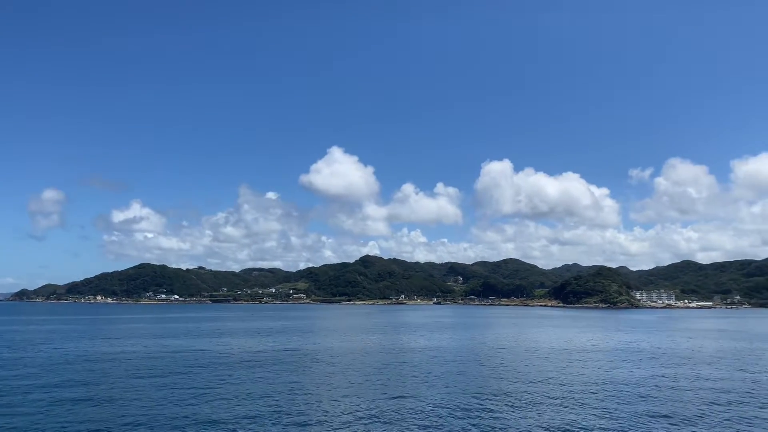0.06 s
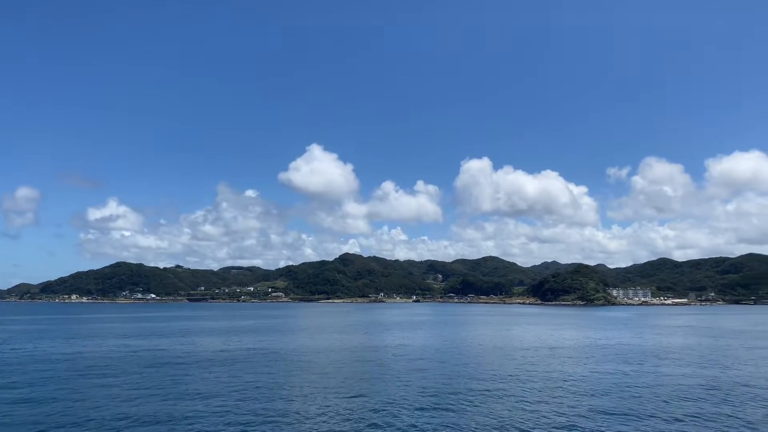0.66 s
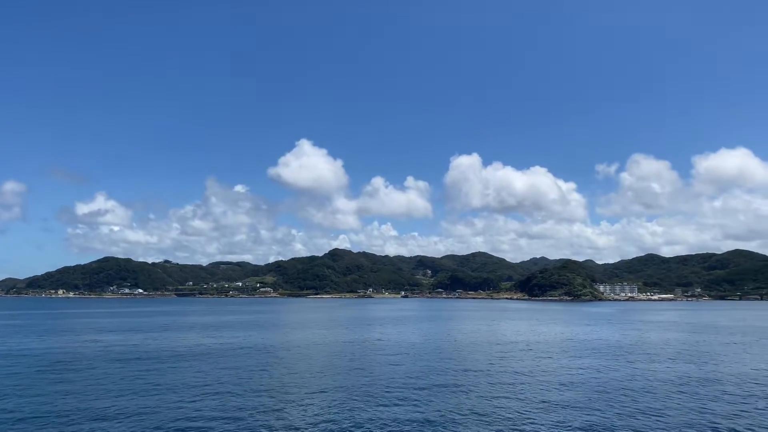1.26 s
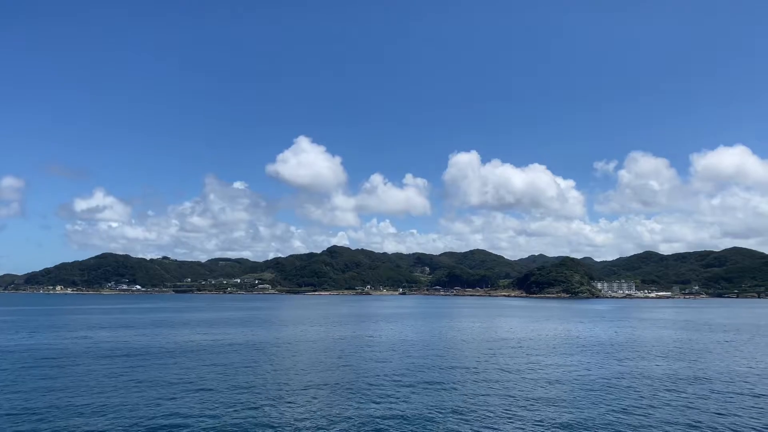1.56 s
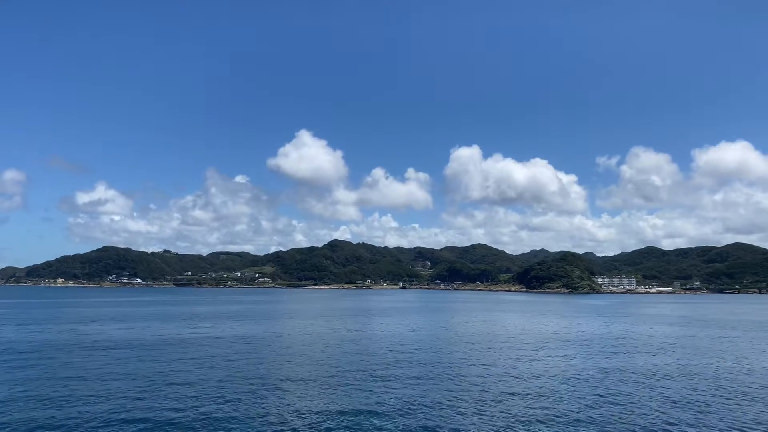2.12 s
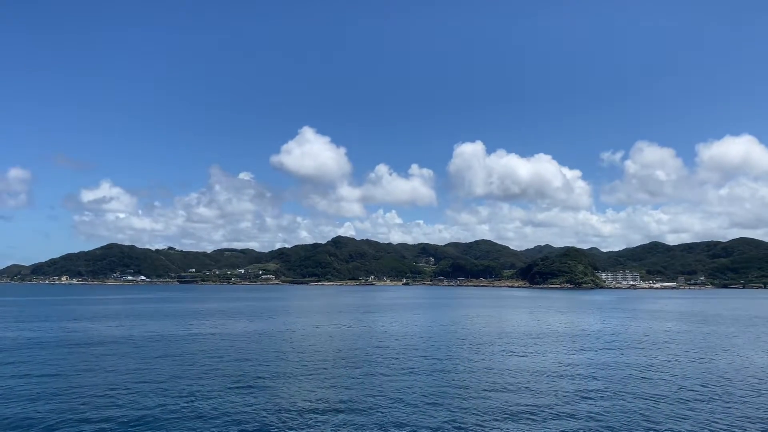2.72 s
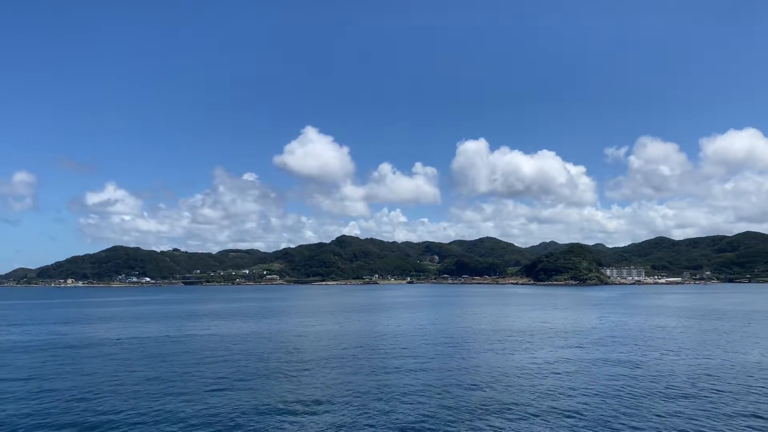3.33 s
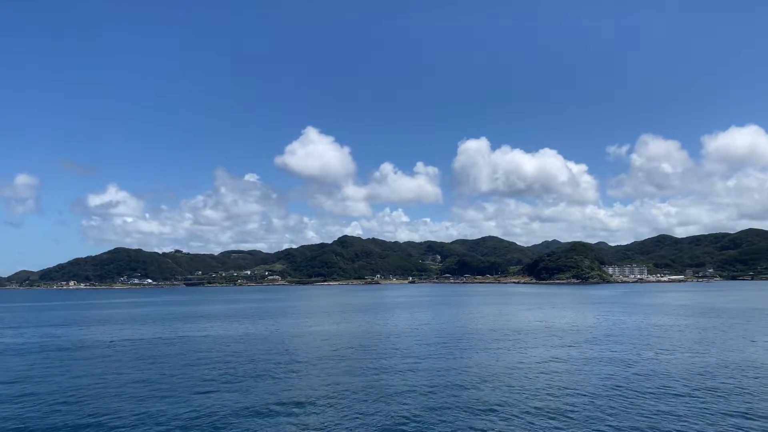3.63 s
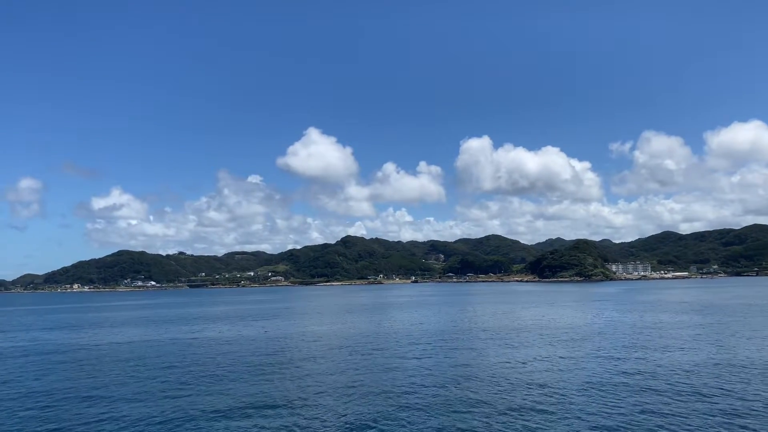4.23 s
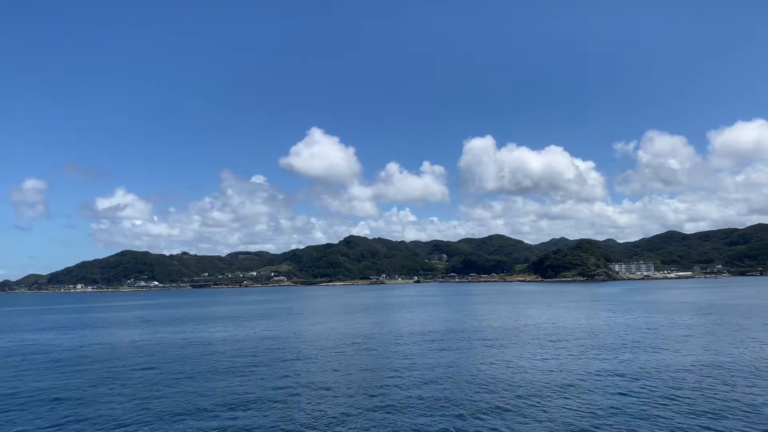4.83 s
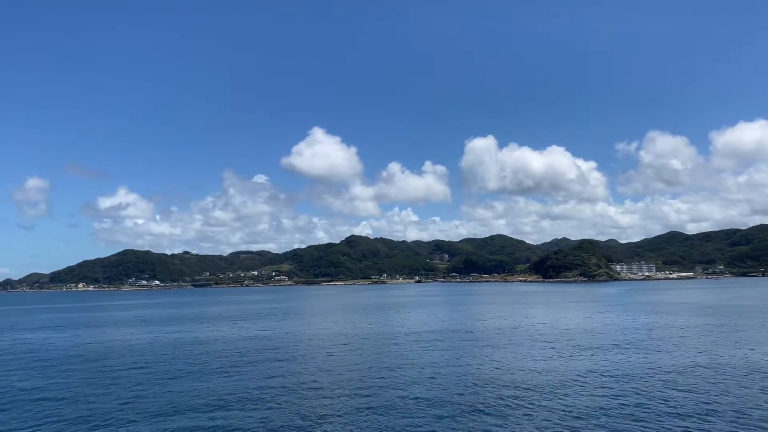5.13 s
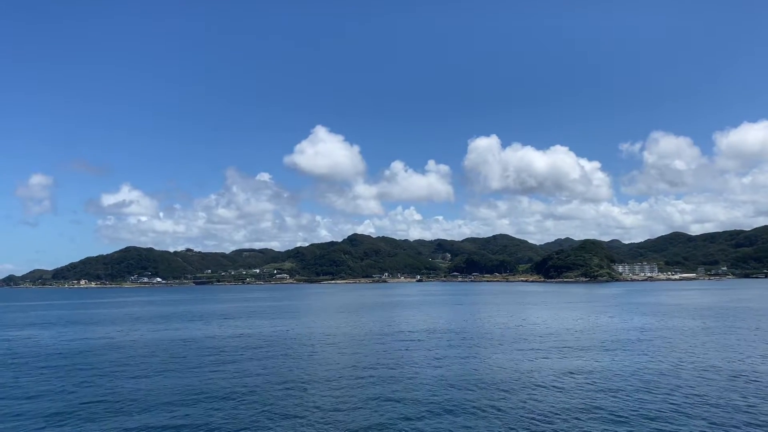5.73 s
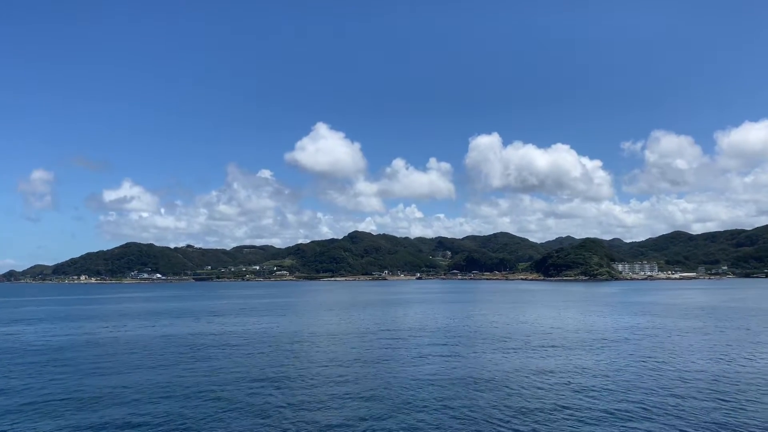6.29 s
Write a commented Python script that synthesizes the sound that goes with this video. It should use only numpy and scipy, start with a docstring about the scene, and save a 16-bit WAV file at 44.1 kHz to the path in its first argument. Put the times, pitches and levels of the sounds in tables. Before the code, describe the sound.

On the open deck of a ferry on a calm sea, diesel engines drone over a throbbing hull and a low roar. Foamy water hisses along the side, easing briefly near the start, and a faint machine whine comes through. About two seconds in, gusts buffet the microphone with a lumpy rumble for a second and a half. A weaker gust comes near the end as the drone continues.

```python
"""On the open deck of a ferry under way on a calm sea. From the start, periodic diesel firings drone over
the throb of the hull and a turbulent roar, while bubbles in the bow wash hiss along the side.
The wash slackens around 1 s, then a machine's whine comes clear. From about 2 s, gusts buffet the
microphone for a second and a half, and wind reduction turns the bass down under them.
A weaker gust follows at 5.6 s, near the end."""
import sys
import numpy as np
from scipy import signal
from scipy.fft import rfft, irfft, next_fast_len
from scipy.io import wavfile
from scipy.ndimage import uniform_filter1d, minimum_filter1d

SR = 44100
rng = np.random.default_rng(int(sys.argv[2]) if len(sys.argv) > 2 else 0)


def wav_out(sig):
    """Save sig, one row per channel (or a flat mono array), as 16-bit PCM at SR to the path in sys.argv[1]."""
    wavfile.write(sys.argv[1], SR, np.round(np.clip(np.atleast_2d(sig).T, -1, 1) * 32767).astype(np.int16))


N = 289296
TIME = np.arange(N) / SR


def gain_of(db):
    """The decibel scale: 20 dB is a factor of ten in amplitude."""
    return 10 ** (np.asarray(db) / 20)


def unit_rms(x):
    """Normalisation to a mean power of one."""
    return x / np.sqrt(np.mean(x ** 2) + 1e-20)


def spectrum_at(points, hz):
    """Interpolation on a logarithmic frequency axis."""
    point_hz, value = np.transpose(points)
    return np.interp(np.log(hz + 1), np.log(point_hz + 1), value)


def wander(rate_hz):
    """Random modulation: noise of rms 1, low-passed at rate_hz."""
    hop = 128
    hz = np.fft.rfftfreq(N // hop, hop / SR)
    slow = irfft(rfft(rng.standard_normal(N // hop)) / (1 + (hz / rate_hz) ** 2))
    return unit_rms(np.interp(TIME, np.arange(len(slow)) * hop / SR, slow))


def noise_pair(spectrum, coherence, size, brightness=1):
    """Partial coherence: two channels share part of a coloured noise, scaled to rms 1."""
    length = next_fast_len(size, real=True)
    hz = np.fft.rfftfreq(length, 1 / SR)
    common, separate = rfft(rng.standard_normal((2, length)))
    shared = np.clip(spectrum_at(coherence, hz) if np.ndim(coherence) else coherence, -1, 1)
    pair = np.array([common, shared * common + np.sqrt(1 - shared ** 2) * separate])
    colour = gain_of(spectrum_at(spectrum, hz / brightness))
    return unit_rms(irfft(pair * colour, length)[:, :size])


def bow_wave_db(base_db=-40.5, swell_db=0.7, period_s=2.04, crest_s=3.73,
                lull_db=-4, lull_s=0.95, lull_width_s=1):
    """Amplitude modulation: the bow wave breaks harder on each crest and slackens once in smooth water."""
    swell = np.cos(2 * np.pi * (TIME - crest_s) / period_s)
    lull = np.exp(-((TIME - lull_s) / lull_width_s) ** 2)
    return base_db + swell_db * swell + lull_db * lull


def droplets(gain_db=-15, per_s=400, q_factor=10, spread_db=3):
    """Damped resonance: falling spray and bursting bubbles ring as short pings of all sizes."""
    out = np.zeros((2, N))
    pitches_hz = np.geomspace(1200, 6000, num=24)
    for k, hz in enumerate(pitches_hz):
        cycles = hz * np.arange(1024) / SR
        ping = np.sin(2 * np.pi * cycles) * (1 - np.exp(-cycles)) * np.exp(-np.pi * cycles / q_factor)
        strength = gain_of(spread_db * np.minimum(rng.exponential(1, N), 4))
        hits = rng.random(N) < per_s / SR / len(pitches_hz)
        out[k % 2] += signal.oaconvolve(strength * hits, ping)[:N]
    return gain_of(gain_db + bow_wave_db()) * unit_rms(out)


# Spectral density of the foam's hiss: frequency_hz, relative_db
WASH_SPECTRUM = [(100, -27), (300, -10.5), (600, -2), (740, -0.5), (1150, -1.5), (1700, -7), (2400, -10),
                 (3500, -13), (5200, -18), (6500, -21), (7700, -21), (8500, -20.5), (10400, -19),
                 (12800, -30), (15500, -23.5)]
# Likeness of the hiss in the two channels: frequency_hz, coherence
WASH_COHERENCE = [(300, .4), (700, .1), (1050, .5), (1600, .12), (2700, .3), (4000, .33), (5500, .12),
                  (7400, .45), (8400, .85), (15000, .9)]
# The hiss leans to the left: frequency_hz, left_minus_right_db
WASH_BALANCE = [(300, -4), (900, 2.5), (2600, 1.5), (4000, 4.5), (5200, 9), (6400, 3), (8300, 0)]
# The hiss reaches the two microphone ports at different times: frequency_hz, left_lead_rad
WASH_LEAD = [(500, 0), (1000, .9), (1800, 0), (3000, 1.5), (5000, .8), (6000, 1.2), (8400, -3.1),
             (10200, -6.3), (12100, -9.4), (14000, -12.6), (15700, -15.7)]


def bow_wash(gain_db=8, patchy_db=1.26, body_depth=1.2, treble_depth=0.81):
    """Incoherent summation: foam hisses as broadband noise, in drifting patches that follow the bow wave."""
    frames = dict(fs=SR, nperseg=1024, noverlap=768)
    hz, t, hiss = signal.stft(noise_pair(WASH_SPECTRUM, WASH_COHERENCE, N), **frames)
    patches = uniform_filter1d(rng.standard_normal(hiss.shape[1:]), size=7, axis=0)
    patches = unit_rms(uniform_filter1d(patches, size=12, axis=1))
    wave_db = np.interp(t, TIME, bow_wave_db())
    depth = spectrum_at([(500, body_depth), (3000, treble_depth)], hz)[:, None]
    foam_db = wave_db.mean() + depth * (wave_db - wave_db.mean()) + patchy_db * patches
    lean_db = spectrum_at(WASH_BALANCE, hz)[:, None] / 2
    hiss = hiss * gain_of(gain_db + foam_db + np.array([lean_db, -lean_db]))
    hiss[0] *= np.exp(1j * spectrum_at(WASH_LEAD, hz))[:, None]
    return signal.istft(hiss, **frames)[1][:, :N]


# The whine comes clear: time_s, relative_db
WHINE_ENVELOPE = [(1.2, -5.5), (3, 2)]


def machine_whine(pitch_hz=496, base_db=-42, right_db=-6, flutter=0.95):
    """Amplitude and frequency modulation: a deck machine off to the left gives a wavering tone."""
    sway = unit_rms(abs(1 + flutter * (wander(7.7) + 1j * wander(6.4))))
    cycles = np.cumsum(pitch_hz + 2 * wander(4.46)) / SR
    tone = np.sqrt(2) * sway * np.sin(2 * np.pi * cycles)
    rise_db = np.interp(TIME, *np.transpose(WHINE_ENVELOPE))
    return gain_of(base_db + rise_db) * gain_of([[0], [right_db]]) * tone


# Tones of the hull and deck plates: pitch_hz, relative_db
PLATE_TONES = [(28.1, -43.5), (56.2, -38.3), (67.8, -34.1), (70.2, -33.6), (77.2, -27.8), (91.3, -35.3)]


def hull_throb(gain_db=-4.5, waver=0.2):
    """Forced vibration: plates shaken by the machinery give low tones that beat against the firing rate."""
    out = np.zeros(N)
    for hz, db in PLATE_TONES:
        sway = 1 + waver * (wander(0.66) + 1j * wander(0.48))
        out += gain_of(db) * (sway * np.exp(2j * np.pi * (hz * TIME + rng.random()))).real
    return np.sqrt(2) * gain_of(gain_db) * out


# Spectral density of the roar: frequency_hz, relative_db
ROAR_SPECTRUM = [(12, -22), (30, -8), (48, 0), (75, 9), (110, -0.5), (160, -5), (220, -8), (280, -16.5),
                 (380, -12.5), (600, -16), (1200, -38.5), (9000, -99)]
# Likeness of the roar in the two channels: frequency_hz, coherence
ROAR_COHERENCE = [(60, 0.93), (160, 0.96), (270, 0.34), (450, 0.1), (800, 0.033)]


def turbulent_roar(level_db=-22.5):
    """Turbulence: exhaust gas and propeller churn radiate broad noise, nearly mono in the bass."""
    return gain_of(level_db) * noise_pair(ROAR_SPECTRUM, ROAR_COHERENCE, N)


# Line spectrum of the exhaust: crank_multiple, left_relative_db, right_relative_db
ENGINE_ORDERS = [(6.0, -14.4, -14.1), (12.0, -21.4, -21.8), (18.0, -16.3, -14.0), (19.0, -48.8, -41.5),
                 (24.0, -36.0, -33.4), (30.0, -48.4, -45.8), (32.0, -45.9, -42.7), (36.0, -43.6, -38.2),
                 (38.0, -48.3, -50.2), (40.0, -58.0, -46.8), (41.0, -58.0, -47.3), (54.0, -54.3, -49.9),
                 (60.0, -54.0, -51.4)]


def diesel_exhaust(crank_hz=9.926, drift=0.0003, left_lag_s=0.00027, spread_rad=0.94):
    """Harmonic series: six firings a turn give strong lines; unequal cylinders add weak, fluttering ones."""
    turns = np.cumsum(crank_hz * (1 + drift * wander(0.43))) / SR
    turns = np.array([turns - crank_hz * left_lag_s, turns])
    out = np.zeros((2, N))
    for order, left_db, right_db in ENGINE_ORDERS:
        if order % 6 == 0 and order < 30:  # the first four harmonics of the firing rate
            gain_db, flutter, phase = -0.16, 0.03, 0
        else:
            gain_db, flutter = 0.4, 0.33
            # weak lines come by many paths over the deck, so each port hears its own phase
            phase = 2 * np.pi * rng.random() + spread_rad * rng.standard_normal((2, 1))
        sway = 1 + flutter * (wander(3.4) + 1j * wander(3.2))
        line = np.sqrt(2) * (sway * np.exp(1j * (2 * np.pi * order * turns + phase))).real
        out += gain_of(gain_db) * gain_of([[left_db], [right_db]]) * line
    return out


# Gusts of wind: full_force_s, hold_s, level_db
WIND_GUSTS = [(2.075, 0.554, -16.5), (2.8, .19, -17), (3.237, .25, -25.5), (5.58, 0.14, -24)]


def wind_force(breeze_db=-38.5, attack_s=0.061, release_s=0.059):
    """Power addition: the amplitude of a steady breeze plus gusts that rise, hold and decay."""
    force = np.full(N, gain_of(breeze_db))
    for full_force_s, hold_s, db in WIND_GUSTS:
        before = np.maximum(full_force_s - TIME, 0) / attack_s
        after = np.maximum(TIME - full_force_s - hold_s, 0) / release_s
        force = np.hypot(force, gain_of(db) * np.exp(-before - after))
    return force


# Spectral density of wind pressure on the microphone: frequency_hz, relative_db
RUMBLE_SPECTRUM = [(15, -20), (45, -1), (95, 3), (160, -4), (260, -9.5), (450, -19.5), (800, -32),
                   (1600, -56), (6000, -86)]


def wind_rumble(lumpy_db=4.0, lump_rate_hz=16, coherence=0.64):
    """Dynamic pressure: unsteady wind presses on the microphone with a lumpy rumble."""
    lumps = gain_of(lumpy_db * wander(lump_rate_hz))
    return wind_force() * lumps * noise_pair(RUMBLE_SPECTRUM, coherence, N)


def lesser_eddies(per_s=30, gain_db=-8, spread_db=1, mid_brightness=1.06, steepness=1.23):
    """Vortex shedding: rows of small eddies at uneven intervals, fading faster than the wind does."""
    jitter, strength, colour = rng.random((256, 3)).T
    peak_s = (np.arange(len(jitter)) + jitter) / per_s
    force = wind_force()
    force_db = 20 * np.log10(np.interp(peak_s, TIME, force) / force.max())
    db = 20 * np.log10(force.max()) + gain_db + steepness * force_db + spread_db * (2 * strength - 1)
    brightness = mid_brightness * 2 ** ((colour - 0.5) / 2)
    inside = (peak_s > 0.1) & (peak_s < TIME[-1] - 0.1)
    return list(zip(peak_s[inside], db[inside], brightness[inside]))


# Spectral density at an eddy's core: frequency_hz, relative_db
EDDY_SPECTRUM = [(40, -16), (130, 7), (280, 4), (460, -2.5), (680, -10.5), (950, -23), (1500, -37),
                 (3500, -75), (9000, -100)]
# The strongest eddies to strike the microphone: peak_s, relative_db, brightness (a frequency ratio)
STRONG_EDDIES = [(1.918, -12.5, .8), (2.033, -13, .8), (2.148, -14.5, 0.66), (2.205, -10.5, 0.89),
                 (2.309, -14.5, 1.5), (2.338, -21, 1.2), (2.434, -14, 1.04), (2.482, -19, 1.05),
                 (2.579, -15.5, .8), (2.791, -11, 1.1), (2.849, -14, 1.12), (2.969, -13.5, 1.06),
                 (2.99, -15.5, 0.8), (3.014, -15.5, 1.1), (3.22, -22.5, 0.75), (3.39, -23, 0.8),
                 (3.493, -20.5, 0.66)]


def eddy_buffets(gain_db=1.44, passage_s=0.0301, sharpness=3.19, skirt_speed=0.55, coherence=0.79):
    """Convected turbulence: a passing eddy is loud and bright at its fast core, dull at its slow skirts."""
    out = np.zeros((2, N))
    above_drone = signal.butter(3, 260, "high", fs=SR, output="sos")
    steps = np.arange(8192)
    t = (steps - len(steps) // 2) / SR
    envelope = np.exp(-sharpness * abs(t) / passage_s)
    travel = np.cumsum(skirt_speed + (1 - skirt_speed) * envelope)
    for peak_s, db, brightness in STRONG_EDDIES + lesser_eddies():
        turbulence = noise_pair(EDDY_SPECTRUM, coherence, len(steps), brightness)
        puff = envelope * np.array([np.interp(travel, steps, port) for port in turbulence])
        # the level applies to the part that stands out above the drone
        puff = puff * np.sqrt(np.mean(envelope ** 2)) / np.std(signal.sosfilt(above_drone, puff))
        start = round((peak_s + t[0]) * SR)
        out[:, start:start + len(t)] += gain_of(gain_db + db) * puff
    return out


def scene():
    """Superposition: the pressures from ship, sea and wind add."""
    ship = diesel_exhaust() + hull_throb() + machine_whine() + turbulent_roar()
    sea = bow_wash() + droplets()
    return ship + sea + wind_rumble() + eddy_buffets()


def wind_reduction(x, threshold_db=-26, slope=0.46, corner_hz=110, averaging_s=0.1):
    """Side-chain compression: when the band above the drone gets loud, the bass is turned down."""
    band = signal.sosfiltfilt(signal.butter(4, [260, 800], "band", fs=SR, output="sos"), x)
    pole = np.exp(-1 / (averaging_s * SR))
    power = signal.lfilter([1 - pole], [1, -pole], (band ** 2).mean(axis=0))
    over_db = np.maximum(10 * np.log10(power + 1e-12) - threshold_db, 0)
    cut_db = uniform_filter1d(slope * over_db, size=512)
    bass = signal.sosfiltfilt(signal.butter(2, corner_hz, fs=SR, output="sos"), x)
    return x - (1 - gain_of(-cut_db)) * bass


def limiter(x, ceiling_db=-1, recover_db_per_s=100, split_hz=900):
    """Split-band peak limiting: the low band ducks at its peaks while the hiss above passes untouched."""
    low = signal.sosfiltfilt(signal.butter(3, split_hz, fs=SR, output="sos"), x)
    peak_db = 20 * np.log10(abs(low).max(axis=0) + 1e-9)
    recovery_db = TIME * recover_db_per_s
    envelope_db = np.maximum.accumulate(peak_db + recovery_db) - recovery_db
    over_db = np.maximum(envelope_db - ceiling_db, 0)
    held_db = minimum_filter1d(-over_db, size=257)
    duck_db = uniform_filter1d(uniform_filter1d(held_db, size=129), size=129)
    return x - (1 - gain_of(duck_db)) * low


def record(dry):
    """Dynamic range control and band limiting: wind reduction, limiter, then a low-pass at 15.7 kHz."""
    soft_ends = signal.windows.tukey(N, 0.0015)
    low_pass = signal.firwin(511, 15700, window=("kaiser", 9), fs=SR)
    return signal.oaconvolve(limiter(wind_reduction(dry)) * soft_ends, low_pass[None], "same")


dry = scene()
out = record(dry)
wav_out(out)
```